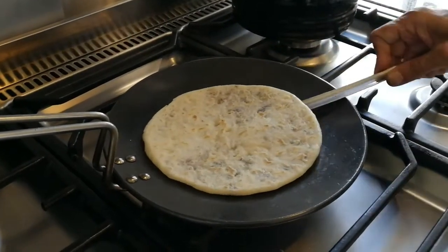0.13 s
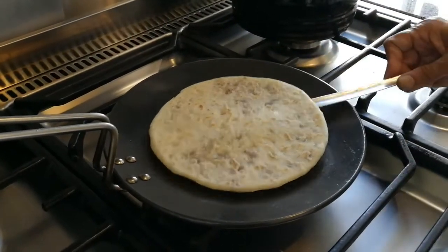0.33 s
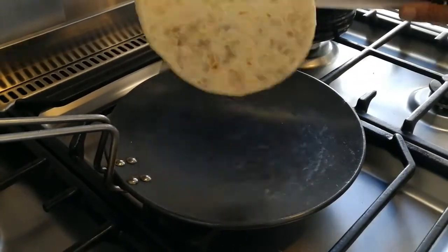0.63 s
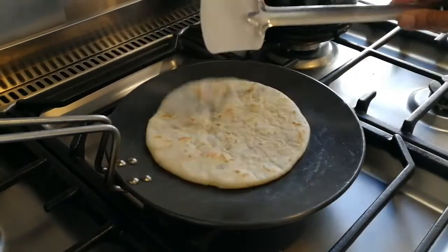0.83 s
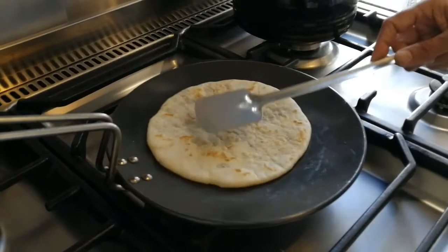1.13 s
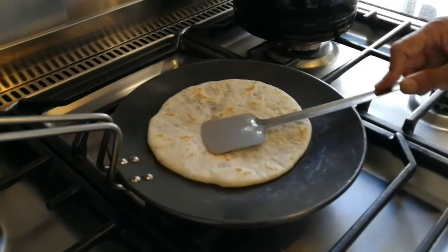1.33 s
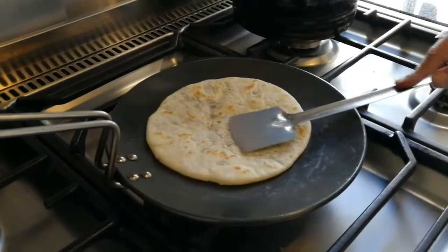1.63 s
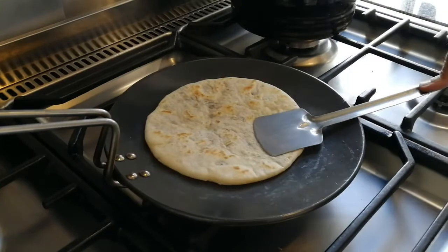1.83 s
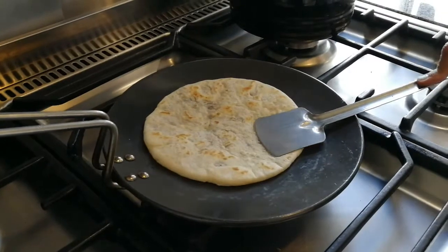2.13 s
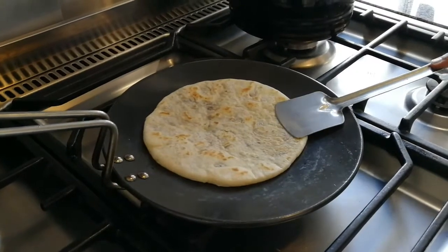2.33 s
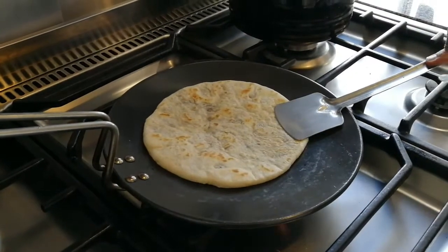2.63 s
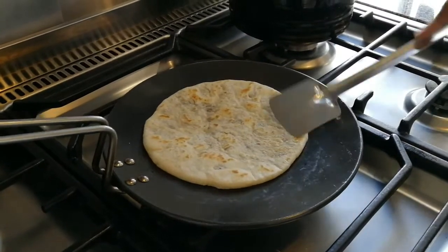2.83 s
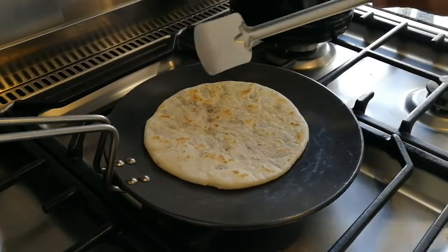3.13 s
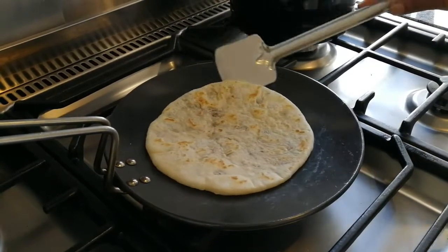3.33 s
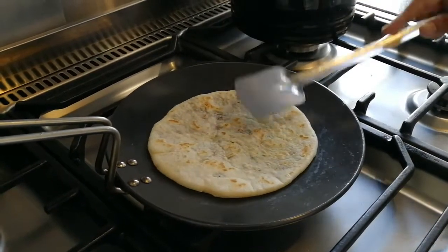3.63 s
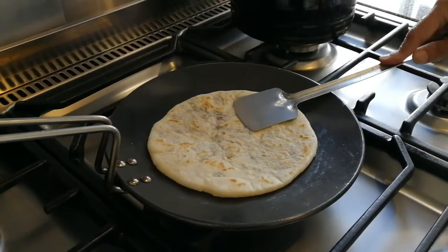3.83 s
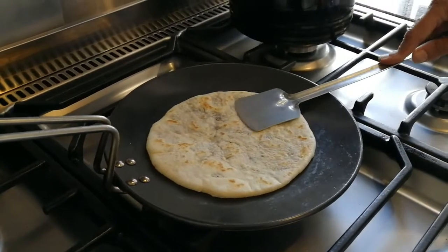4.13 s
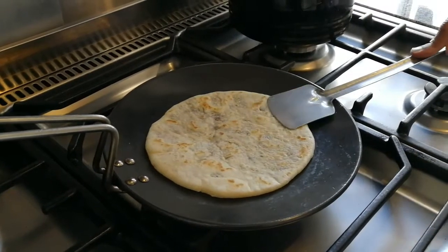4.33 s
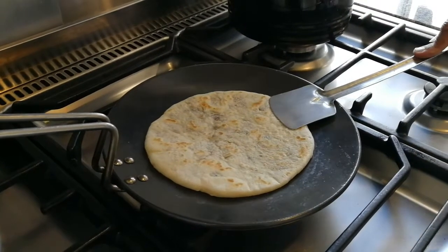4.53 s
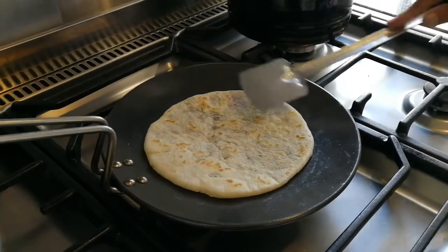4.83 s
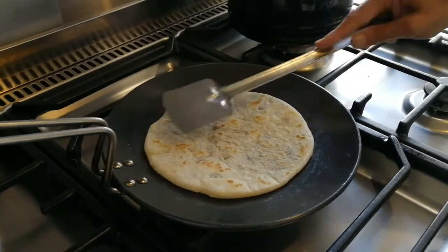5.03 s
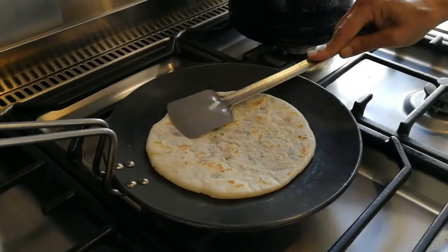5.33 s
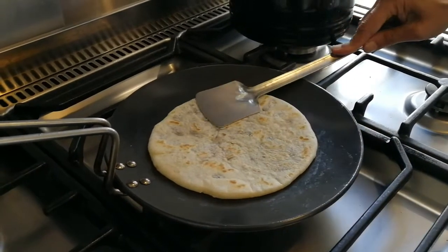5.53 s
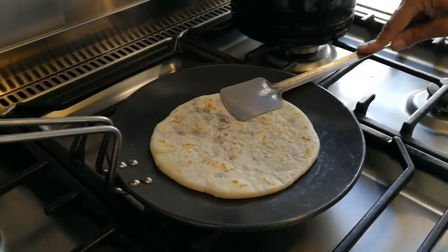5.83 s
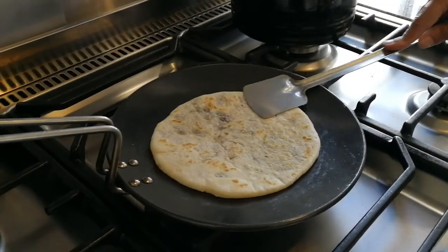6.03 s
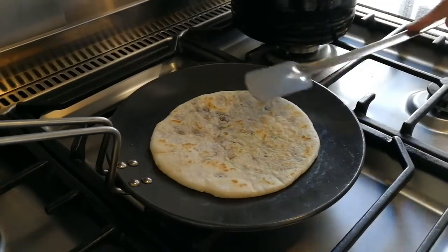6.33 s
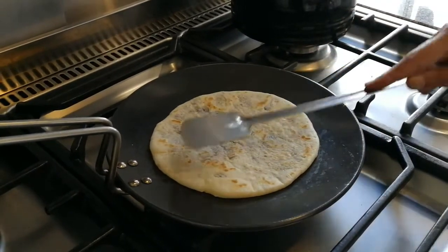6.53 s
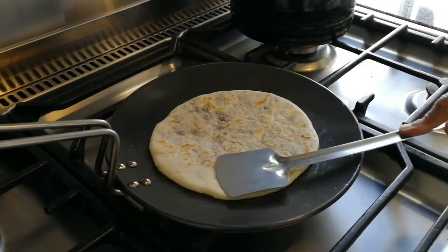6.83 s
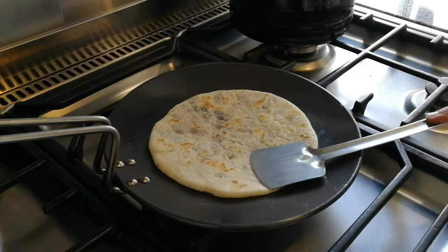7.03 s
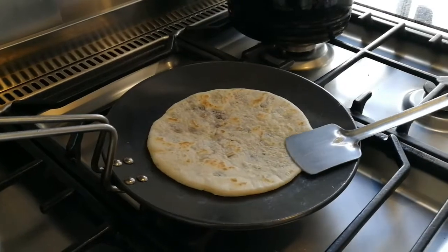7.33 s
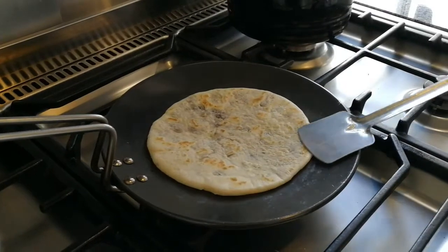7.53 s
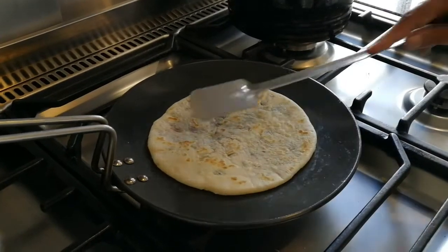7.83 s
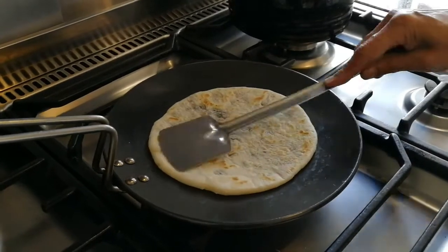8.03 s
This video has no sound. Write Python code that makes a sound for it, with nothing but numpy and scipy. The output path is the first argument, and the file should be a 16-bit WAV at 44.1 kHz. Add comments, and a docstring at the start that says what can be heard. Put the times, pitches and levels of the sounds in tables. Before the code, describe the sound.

A steel spatula clacks hard on an iron griddle, then scrapes, taps and rubs dry flatbread over a steady gas burner hum.

```python
"""A small hard-walled kitchen: a flatbread is flipped on an iron griddle, then pressed and turned with a
steel spatula. Blows and light clinks are noise bursts plus decaying modes of griddle and blade; scrapes and
rubs are dense random clicks, coloured by the touching iron or by dry crust; squeals are unsteady sines.
The griddle knocks on its grate and the hob booms; a gas burner, shaped noise, hisses and hums underneath."""
import sys
import numpy as np
from scipy import signal
from scipy.fft import rfft, irfft, next_fast_len
from scipy.io import wavfile

SR = 44100
rng = np.random.default_rng(int(sys.argv[2]) if len(sys.argv) > 2 else 0)


def put_to_file(sound):
    """Save the sound as 16-bit audio at rate SR, in the file named by the first command-line argument."""
    columns = np.atleast_2d(sound).T  # one column per channel
    safe = np.clip(columns, -1, 1)
    whole_steps = np.round(safe * 32767)
    wavfile.write(sys.argv[1], SR, whole_steps.astype(np.int16))


N = 361614
TIME = np.arange(N) / SR
AGE = TIME[:SR // 2]  # seconds since a blow

# Free modes of the griddle. Each row: frequency in Hz, level in dB, t60 in seconds.
GRIDDLE_MODES = [(754, -9.5, 0.49), (960, 3.5, 0.041), (1604, 8.5, 0.09), (1613, 8, .12), (1990, 7, 0.26),
                 (2593, -0.5, 0.16), (3060, -53, .2), (4005, -45, 0.2), (4040, 1.5, 0.33),
                 (4330, 0.5, 0.33), (4450, -15, 0.13), (4857, 4, 0.17), (5300, 7.5, 0.33), (5706, -4, 0.16),
                 (6040, -3, .2), (6750, -18.5, 0.18), (7680, 3, 0.047), (9200, -34, .14), (9050, -4, .14),
                 (9510, -3, 0.13), (9450, -26, .12), (11000, -10, .12), (10900, -17, .14), (13100, -18, .1)]
# Free modes of the spatula. Each row: frequency in Hz, level in dB, t60 in seconds.
SPATULA_MODES = [(1680, -26, 0.35), (2213, 7, 0.062), (2954, 0, 0.14), (3655, 1, 0.15), (4020, -3.5, 0.077),
                 (4705, 1, 0.18), (5400, -50, 0.16), (5445, 5.5, 0.051), (5980, 1.5, 0.11),
                 (6390, 3, 0.064), (6790, -5, 0.043), (6990, 3, 0.26), (7950, 1, 0.15), (8510, -1.5, 0.34),
                 (9000, -10, .13), (10120, -1, 0.11)]


def undb(db):
    """Decibels to gain."""
    return 10 ** (np.asarray(db) / 20)


def unit(x):
    """Scale to rms 1."""
    return x / np.sqrt(np.mean(x ** 2))


def spectrum(points, hz):
    """Gain of a (Hz, dB) outline on a log-frequency axis."""
    f, db = np.transpose(points)
    return undb(np.interp(np.log(hz + 1), np.log(f), db))


def bump(hz, centre_hz, octaves):
    """A bell of height 1 around a frequency."""
    return np.exp(-.5 * (np.log2((hz + 1) / centre_hz) / octaves) ** 2)


def noise(gain, size, alike_hz=330):
    """Stereo noise of rms 1 coloured by gain(Hz); long waves reach both ports alike."""
    hz = np.fft.rfftfreq(size, 1 / SR)
    mid, side = rfft(rng.standard_normal((2, size)))
    alike = 1 / (1 + (hz / alike_hz) ** 2)
    mid = mid * np.sqrt(1 + alike)
    side = side * np.sqrt(1 - alike) * np.array([[1], [-1]])
    return unit(irfft(gain(hz) * (mid + side), size))


def fade(t60):
    """Exponential decay, 60 dB in t60 seconds."""
    return np.exp(-np.log(1000) * AGE / t60)


def swell(rise_s):
    """Soft onset."""
    return 1 - np.exp(-(AGE / rise_s) ** 2)


def ring(modes, gain=np.ones_like, scatter_db=7.5, detune=0.00457, alike_hz=330):
    """Decaying modes, rms 1 at the start, shared out a little differently by each blow; low ones in step."""
    hz, db, t60 = np.transpose(modes)
    size = undb(db + scatter_db * rng.standard_normal((2, len(hz)))) * gain(hz)
    hz = hz * (1 + detune * rng.standard_normal(len(hz)))
    port_turns = rng.random(size.shape) * np.minimum(hz / alike_hz / 2, 1)
    turns = rng.random(len(hz)) + port_turns
    weights = 2 * size * np.exp(2j * np.pi * turns) / np.sqrt(np.sum(size ** 2))
    decaying = np.exp(2j * np.pi * hz[:, None] * AGE) * fade(t60[:, None])
    return np.imag(weights @ decaying)


def add(out, s, sound):
    """Mix a sound in at time s."""
    i = int(s * SR)
    out[:, i:i + sound.shape[1]] += sound[:, :N - i]


def through(x, response):
    """Pass a signal through a stereo impulse response."""
    return signal.fftconvolve(np.atleast_2d(x), response, axes=1)[:, :N]


def tint(x, gain):
    """Colour a signal by gain(Hz)."""
    size = next_fast_len(x.shape[-1])
    grid_hz = np.linspace(0, SR / 2, 4096)
    curve = np.interp(np.fft.rfftfreq(size, 1 / SR), grid_hz, gain(grid_hz))
    return irfft(rfft(x, size) * curve, size)[..., :x.shape[-1]]


def walk(rate_hz):
    """Random line of rms 1, straight between rate_hz knots per second."""
    knots = rng.standard_normal(int(N / SR * rate_hz) + 2)
    return unit(np.interp(TIME * rate_hz, np.arange(len(knots)), knots))


def slips(per_s, spread_db):
    """Dense tiny friction clicks of uneven size, as they reach the two ports."""
    size = undb(spread_db * np.minimum(rng.exponential(size=N), 4))
    happens = rng.random(N) < per_s / SR
    return unit(happens * size * rng.standard_normal((2, N)))


def strokes(rows, sag_db_per_s, release_db_per_s):
    """Friction over time: each stroke swells, eases as the hand slows, and dies away as the blade lifts."""
    out = np.zeros(N)
    for s, rise_s, length_s, db in rows:
        age = np.maximum(TIME - s, 0)
        fall_db = sag_db_per_s * age + release_db_per_s * np.maximum(age - length_s, 0)
        out = np.maximum(out, undb(db - fall_db) * (1 - np.exp(-(age / rise_s) ** 2)))
    return out


def pressed(modes, f, width_hz=60, width_share=0.0042, scatter_db=3):
    """Power response of modes broadened by contact; every touch weighs them a little differently."""
    hz, db, _ = np.transpose(modes)[:, :, None]
    size = undb(db + scatter_db * rng.standard_normal(hz.shape))
    width = width_hz + width_share * hz
    return np.sum((size / (1 + ((f - hz) / width) ** 2)) ** 2, axis=0)


def contact(f, spatula_db, between_db=-7):
    """Response of blade and griddle while they touch: broad peaks over a bed of weak modes."""
    # Bed between the peaks, before between_db. Each row: frequency in Hz, level in dB.
    bed_outline = [(100, -5.5), (600, -9), (1500, -8), (3000, 2), (5000, -6.5), (7500, 0), (10000, -29),
                   (12000, -9.5), (16000, -56)]
    share = 1 / (1 + undb(-spatula_db) ** 2)
    peaks = share * pressed(SPATULA_MODES, f) + (1 - share) * pressed(GRIDDLE_MODES, f)
    return np.sqrt(peaks + (undb(between_db) * spectrum(bed_outline, f)) ** 2)


def blow(contact_s, spatula_db, hz, lift_db, tilt_db, favour_octaves=0.092, tail_db=-16, tail_t60=0.12,
         hold=2.95, rise=0.37, ring_db=-15):
    """The blade chatters briefly on the iron, both ring on; the point of contact favours one pitch."""
    def colour(f):
        """Stress on the favoured pitch, with a tilt around it."""
        return undb(lift_db * bump(f, hz, favour_octaves) + tilt_db * np.log2(f / hz + 1 / 10))
    # hold and rise are multiples of contact_s
    chatter = np.exp(-(AGE / (hold * contact_s)) ** 2 / 2) + undb(tail_db) * fade(tail_t60)
    clash = noise(lambda f: contact(f, spatula_db) * colour(f), len(AGE)) * chatter
    metal = ring(GRIDDLE_MODES, colour) + undb(spatula_db) * ring(SPATULA_MODES, colour)
    metal = metal / np.hypot(1, undb(spatula_db))
    return swell(rise * contact_s) * (clash + undb(ring_db) * metal)


def boom(hz, rise_s=0.019, t60=0.42, octaves=0.21, sub_db=-12):
    """The sheet-steel hob booms late and stays long, with a weaker band an octave below."""
    def colour(f):
        """Narrow band at hz plus a wide one at half of it."""
        return bump(f, hz, octaves) + undb(sub_db) * bump(f, hz / 2, 1)
    return swell(rise_s) * noise(colour, len(AGE), alike_hz=466) * fade(t60)


def kitchen(x, split_hz=3500, low_t60=0.33, treble_t60=0.11, room_db=-3.5):
    """Dense reflections from tiles and steel; the treble dies first."""
    low = noise(lambda f: 1 / np.hypot(1, f / split_hz), len(AGE)) * fade(low_t60)
    high = noise(lambda f: f / np.hypot(f, split_hz), len(AGE)) * fade(treble_t60)
    response = (low / 2 + high) * swell(0.0039)
    response = response / np.sqrt(np.sum(response ** 2) / 2)
    return x + undb(room_db) * through(x, response)


def burner(waver_db=1.0):
    """Gas flow as noise of gently wavering level: hiss, a low hum, a hollow band near 1 kHz, jet bands."""
    # Broad spectrum of the flow. Each row: frequency in Hz, level in dB per Hz.
    flow_outline = [(20, -99), (60, -86), (130, -96.5), (185, -97), (400, -102), (750, -98), (1250, -91.5),
                    (1500, -103), (3200, -107), (5500, -107), (9000, -109), (12000, -112), (15500, -117)]
    # Resonances of burner and gas jet. Each row: frequency in Hz, width in Hz, level in dB per Hz.
    jet_peaks = [(120.4, 32.6, -82.5), (246.3, 61, -91.5), (684, 55, -88.5), (900.7, 105, -80.5),
                 (999, 32, -79.5), (1105, 64, -78), (1228.5, 77, -80.5), (2300, 1500, -103),
                 (4040, 690, -101), (8080, 450, -104), (10250, 840, -99)]

    def density(f):
        """Amplitude per root Hz."""
        peaks = sum(undb(db) ** 2 / (1 + ((f - hz) / width_hz) ** 2 * 2) ** 3
                    for hz, width_hz, db in jet_peaks)
        return np.sqrt(spectrum(flow_outline, f) ** 2 + peaks)
    rms = np.sqrt(np.sum(density(np.arange(SR // 2)) ** 2))  # summed in 1 Hz steps
    return rms * noise(density, next_fast_len(N))[:, :N] * undb(waver_db * walk(4.6))


def hob_booms():
    """Low booms of the hob, some on their own, some deepening a knock at the same moment."""
    # Each row: start in seconds, level in dB, boom frequency in Hz.
    boom_rows = [(.662, -40, 57), (0.734, -41, 114), (0.819, -52, 89.5), (.919, -49, 49), (1.58, -51, 140),
                 (2.742, -45.5, 118), (3.091, -48.5, 117), (3.638, -57, 60), (7.811, -49.5, 57)]
    out = np.zeros((2, N))
    for s, db, hz in boom_rows:
        add(out, s, undb(db) * boom(hz))
    return out


def knocks(thud_t60=0.26, rise_s=0.0029, thud_db=-1.5, grate_db=-2.5, lift_db=10, favour_octaves=0.1,
           hob_hz=116, hob_db=-10.5):
    """The griddle is pushed against its grate: thud noise and ringing bars, each shaking the hob."""
    # Each row: start in seconds, level in dB, favoured grate frequency in Hz.
    knock_rows = [(.635, -39, 690), (.657, -50, 663), (.735, -49, 252), (.819, -51, 250), (1.546, -44, 705),
                  (1.992, -48, 560), (2.141, -51, 663), (2.627, -45.5, 550), (2.74, -49.5, 253),
                  (3.091, -56, 730), (3.639, -52.5, 646), (3.731, -49.5, 694), (4.002, -45.5, 537),
                  (4.15, -47.5, 690), (4.557, -46, 555), (6.813, -46, 460), (6.84, -45, 257),
                  (7.379, -44.5, 372), (8.149, -56, 564)]
    # Grate modes. Each row: frequency in Hz, level in dB, t60 in seconds.
    grate_modes = [(257.3, 4, 0.42), (362.6, 1.5, 0.45), (489.8, 5.5, 0.26), (562.5, 6, 0.13),
                   (662, 9, 0.094), (722, 8, 0.15), (920, -18, 0.52), (1107, 11.5, 0.085)]
    # Thud spectrum. Each row: frequency in Hz, level in dB.
    thud_outline = [(60, -8.5), (180, -3), (450, -7.5), (800, -2), (1300, -7.5), (2500, -17), (8000, -46)]
    out = np.zeros((2, N))
    for s, db, hz in knock_rows:
        thud = noise(lambda f: spectrum(thud_outline, f), len(AGE)) * fade(thud_t60)
        bars = ring(grate_modes, lambda f: undb(lift_db * bump(f, hz, favour_octaves)),
                    scatter_db=1.5, alike_hz=500)
        hit = swell(rise_s) * (undb(thud_db) * thud + undb(grate_db) * bars)
        add(out, s, undb(db) * (hit + undb(hob_db) * boom(hob_hz)))
    return out


def crust(snap_t60=0.029, uneven_db=3.5, flakes_per_s=14, flake_db=6):
    """Dry crust rasps under the blade, small flakes break at random, and larger snaps stand out."""
    # Brushing strokes. Each row: start in seconds, rise in seconds, length in seconds, level in dB.
    rub_rows = [(.51, 0.0096, 0.018, -59.5), (1.36, 0.098, 0.15, -55.5), (5.01, 0.0079, 0.25, -53.5),
                (5.4, 0.024, 0.24, -66), (5.88, 0.034, 0.095, -61.5), (6.44, 0.026, 0.18, -56),
                (6.66, 0.014, 0.084, -50.5), (6.8, .02, 0.21, -59.5), (7.81, 0.041, 0.26, -58),
                (8.01, 0.014, .2, -53.5)]
    # Snaps under the blade or as the bread lands. Each row: start in seconds, level in dB.
    snap_rows = [(0.643, -19), (0.6572, -22), (1.031, -52), (3.537, -42.5), (5.021, -39.5), (5.1171, -39),
                 (5.171, -43), (6.527, -37), (6.668, -41.5), (6.718, -40), (6.731, -38.5), (8.014, -37.5)]
    # Crust spectrum. Each row: frequency in Hz, level in dB.
    crust_outline = [(100, -51), (1200, -1), (2500, -11), (5000, -2), (8000, 2.5), (10000, 3.5),
                     (11200, -4), (13000, -6), (15500, -15)]

    def colour(f):
        """Gain of the crust."""
        return spectrum(crust_outline, f)

    def snap():
        """One flake breaking: a short noise burst."""
        return fade(snap_t60) * noise(colour, len(AGE))
    rubbing = strokes(rub_rows, sag_db_per_s=1.5, release_db_per_s=154) * undb(uneven_db * walk(40))
    out = unit(tint(slips(6000, 0.62), colour)) * rubbing
    flakes = rng.random(N) < flakes_per_s / SR
    out += undb(flake_db) * through(flakes * rubbing, snap())  # flake_db is relative to the rubbing
    for s, db in snap_rows:
        add(out, s, undb(db) * snap())
    return out


def squeals(flutter_db=3, wobble_hz=14):
    """The sliding blade sings unsteadily: sines of wobbling pitch and level, a quarter turn between ports."""
    # Each row: start in seconds, length in seconds, frequency in Hz, level in dB.
    squeal_rows = [(2.98, .11, 874, -47), (3.08, 0.14, 882, -53), (3.188, 0.15, 7990, -54.5),
                   (6.718, 0.17, 1651, -50), (6.933, 0.07, 1585, -62), (7.082, 0.11, 1610, -57.5)]
    out = np.zeros((2, N))
    for s, length_s, hz, db in squeal_rows:
        phase = 2 * np.pi * np.cumsum(hz + wobble_hz * walk(95)[:len(AGE)]) / SR
        pressure = np.sqrt(np.maximum(np.sin(np.pi * np.minimum(AGE / length_s, 1)), 0))
        flutter = undb(flutter_db * walk(83)[:len(AGE)])
        add(out, s, undb(db) * pressure * flutter * np.array([np.sin(phase), np.cos(phase)]))
    return out


def scrape(spatula_db=0, shift_db=6, uneven_db=1.0, count=3, catches_per_s=18, catch_db=2):
    """Stick and slip of steel on iron; mode sets take turns as the edge travels, and at times it catches."""
    # Each row: start in seconds, rise in seconds, length in seconds, level in dB.
    scrape_rows = [(1.1, 0.043, .08, -62), (1.99, 0.022, 0.12, -53), (2.99, .01, .06, -53),
                   (3.05, .01, .125, -41.5), (3.55, 0.013, 0.11, -55), (4.0, .015, 0.094, -50),
                   (4.1, .02, 0.076, -56), (5.63, 0.023, 0.23, -54), (6.7, 0.039, 0.31, -54),
                   (7.07, 0.017, 0.16, -52.5), (7.86, 0.086, .34, -56)]
    # Sliding spectrum, on top of the contact response. Each row: frequency in Hz, level in dB.
    slide_outline = [(100, -1), (700, -1.5), (1600, -6), (2600, -4.5), (3600, 1), (4600, 1), (5400, -7),
                     (6400, 4), (8000, 2), (9200, 6.5), (10300, 7), (12000, 2), (16000, 30)]

    def colour(f):
        """Gain of one set of modes."""
        return contact(f, spatula_db) * spectrum(slide_outline, f)
    grips = undb(shift_db * np.array([walk(30) for _ in range(count)]))
    grips = grips / np.sqrt(np.sum(grips ** 2, axis=0))
    rasp = sum(grip * unit(tint(slips(2800, 1.4), colour)) for grip in grips)
    sliding = strokes(scrape_rows, sag_db_per_s=16.5, release_db_per_s=235) * undb(uneven_db * walk(45))
    catches = rng.random(N) < catches_per_s / SR
    catch = blow(contact_s=0.0041, spatula_db=8, hz=5300, lift_db=1, tilt_db=1.5)
    return rasp * sliding + undb(catch_db) * through(catches * sliding, catch)


def clinks():
    """Light touches in which mostly the spatula sounds; level is their only setting that differs."""
    # Each row: start in seconds, level in dB.
    clink_rows = [(1.191, -47), (2.177, -55), (2.731, -49.5), (2.847, -49.5), (3.6078, -45), (4.654, -44.5),
                  (4.782, -51.5), (4.914, -54), (5.197, -43), (7.171, -51), (7.593, -51.5), (7.725, -59)]
    out = np.zeros((2, N))
    for s, db in clink_rows:
        clink = blow(contact_s=0.0055, spatula_db=7.5, hz=5094, lift_db=17.5, tilt_db=-3,
                     favour_octaves=0.082, ring_db=-16)
        add(out, s, undb(db) * clink)
    return out


def taps(even_contact_s=0.0047, spatula_db_per_halving=4.5):
    """Blows on the griddle; the shorter the contact, the more the spatula rings over the griddle."""
    # Each row: start in seconds, level in dB, contact time scale in seconds, favoured frequency in Hz,
    # its lift in dB, tilt in dB per octave.
    tap_rows = [(0.6311, -30.5, 0.0055, 1600, 2.5, -1.5), (.645, -25, 0.0017, 4010, 10.5, -3.5),
                (.657, -26.5, 0.0015, 960, 14.5, -2.5), (.693, -37.5, 0.0035, 6160, 16, -4),
                (.753, -35, 0.0039, 5600, 4, 3), (0.827, -46, 0.0064, 3960, 5.5, -2),
                (.94, -53.5, 0.016, 2180, 11, -5.5), (1.511, -20.5, 0.0016, 5500, 6, 3),
                (1.518, -30.5, 0.0027, 7000, 11, 7.5), (1.546, -38, 0.006, 1706, 22, 6),
                (1.598, -44.5, 0.0056, 2880, 10, -0.5), (1.991, -46.5, 0.0074, 1690, 4, -1),
                (2.03, -43.5, 0.0088, 5100, 12, 6.5), (2.087, -40.5, 0.0066, 6950, 3, 2),
                (2.125, -40, 0.0056, 7700, 5, 0.5), (2.623, -31.5, 0.0066, 4440, 5.5, 4.5),
                (2.698, -47, 0.0099, 6100, 10, -3), (2.808, -43, 0.0055, 6300, 6, 2.5),
                (2.966, -48, .0068, 2200, 11, 4), (2.985, -27.5, 0.0022, 3390, 14, 0.5),
                (3.054, -37, 0.003, 6200, 7, 15), (3.644, -54, 0.0087, 1860, 12, -3),
                (3.725, -44.5, 0.0049, 1720, 20.5, 2), (4.004, -36.5, 0.0064, 4250, 6, 0),
                (4.037, -38, 0.0041, 5100, 15, 10), (4.145, -45.5, 0.008, 1730, 13.5, 1),
                (4.555, -34.5, 0.0073, 4360, 5.5, 4), (5.728, -48, 0.0061, 4770, 19, 4),
                (5.791, -50, .005, 7000, 6, 0), (6.418, -41.5, 0.0004, 4300, -4, 4),
                (6.745, -39.5, 0.0038, 7000, 4, 3), (6.809, -39.5, 0.0062, 4770, 3, 3.5),
                (7.122, -44.5, 0.0025, 6800, 14, 9), (7.372, -39, 0.0067, 6900, 4.5, 1.5),
                (8.029, -40, 0.0035, 7800, -3, 6)]
    out = np.zeros((2, N))
    for s, db, contact_s, hz, lift_db, tilt_db in tap_rows:
        spatula_db = spatula_db_per_halving * np.log2(even_contact_s / contact_s)
        add(out, s, undb(db) * blow(contact_s, spatula_db, hz, lift_db, tilt_db))
    return out


def scene():
    """Spatula, griddle and bread in the kitchen, over the burner."""
    return kitchen(taps() + clinks() + knocks() + hob_booms() + scrape() + squeals() + crust()) + burner()


def record(dry, top_hz=15800):
    """The two microphone ports colour the sound differently; the top is cut."""
    # Port difference. Each row: frequency in Hz, left minus right in dB.
    port_outline = [(150, -0.5), (400, 1), (700, 9.5), (1000, 0.5), (1300, 1), (4400, 0), (7000, -1),
                    (9000, 7.5), (11000, 14.5), (15000, 4.5)]
    size = next_fast_len(N + SR // 10)
    ratio = spectrum(port_outline, np.fft.rfftfreq(size, 1 / SR))
    ports = np.array([ratio, np.ones_like(ratio)]) / np.sqrt((1 + ratio ** 2) / 2)
    heard = irfft(rfft(dry, size) * ports, size)[:, :N]
    return signal.sosfilt(signal.ellip(10, .2, 70, top_hz, fs=SR, output="sos"), heard)


dry = scene()
out = record(dry)
put_to_file(out)
```